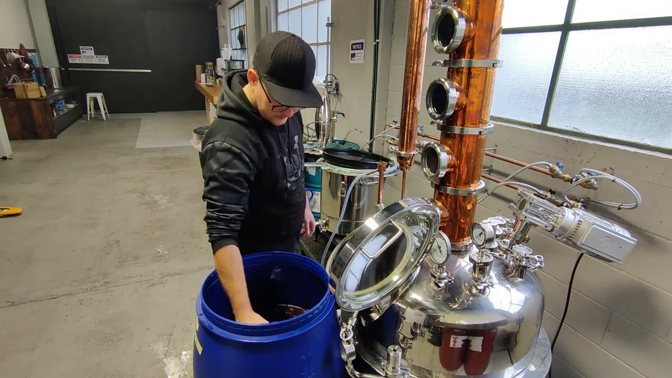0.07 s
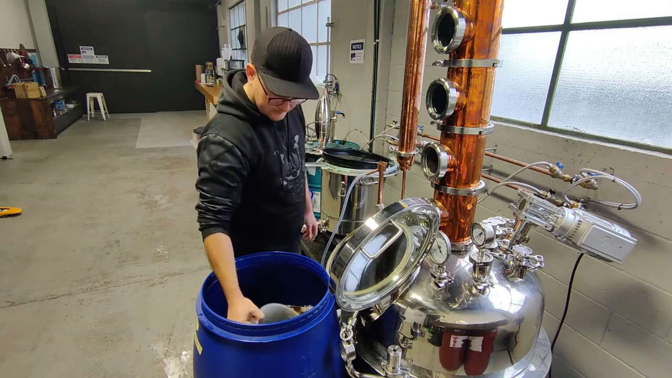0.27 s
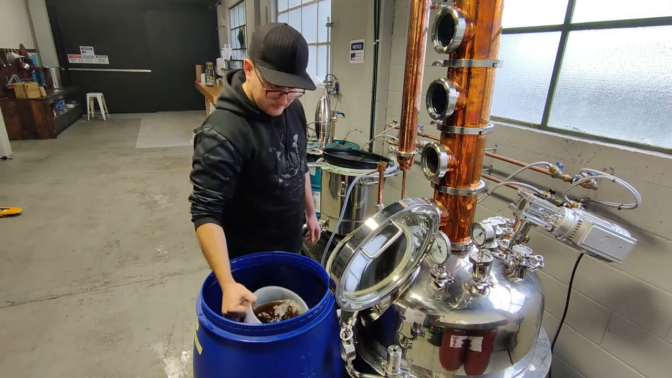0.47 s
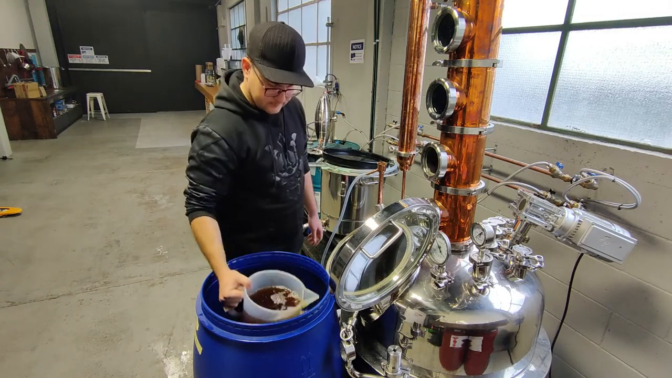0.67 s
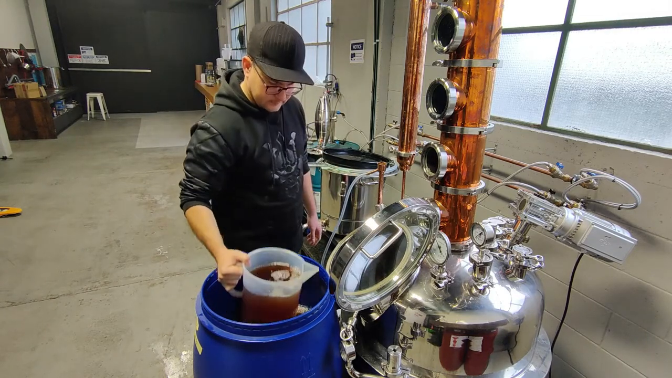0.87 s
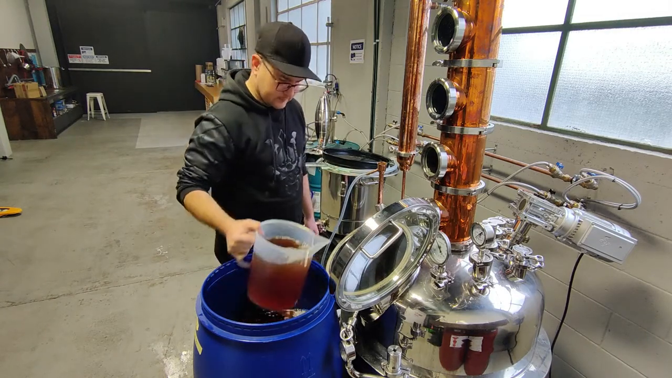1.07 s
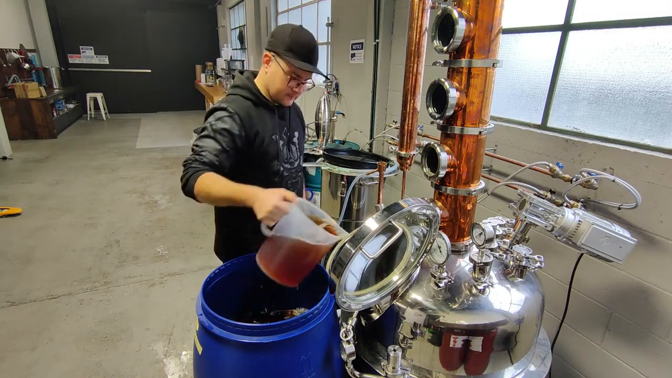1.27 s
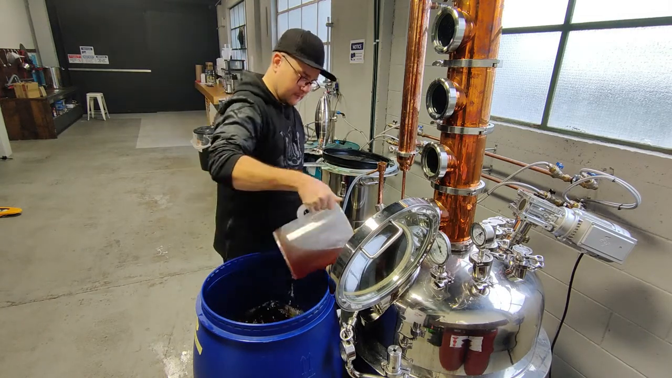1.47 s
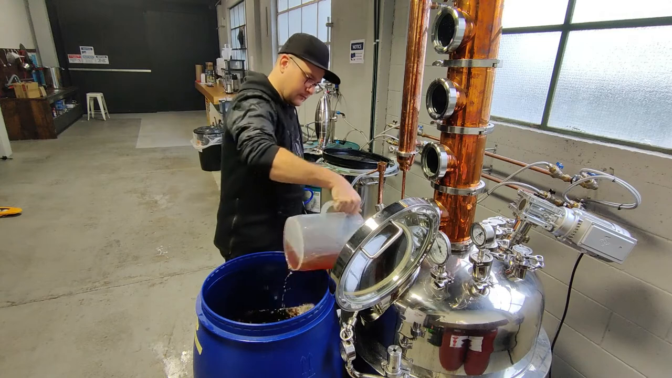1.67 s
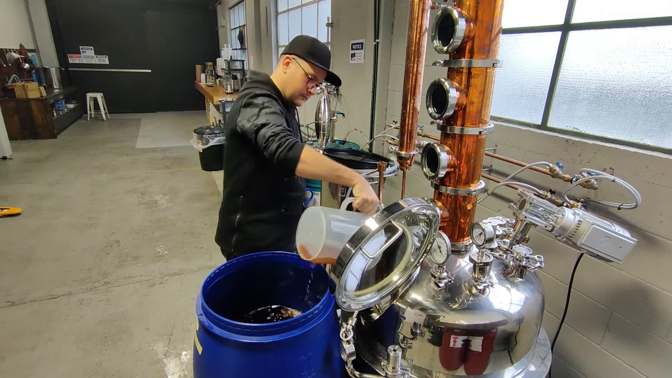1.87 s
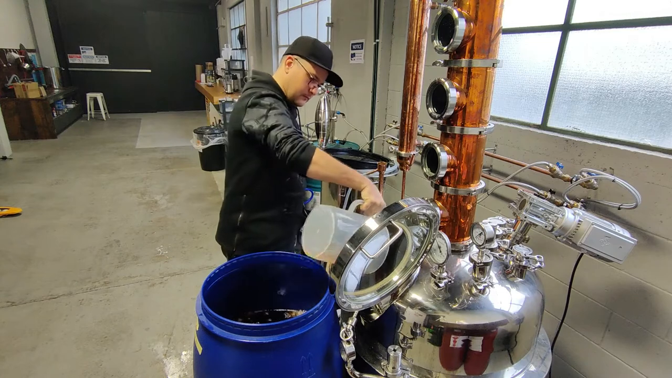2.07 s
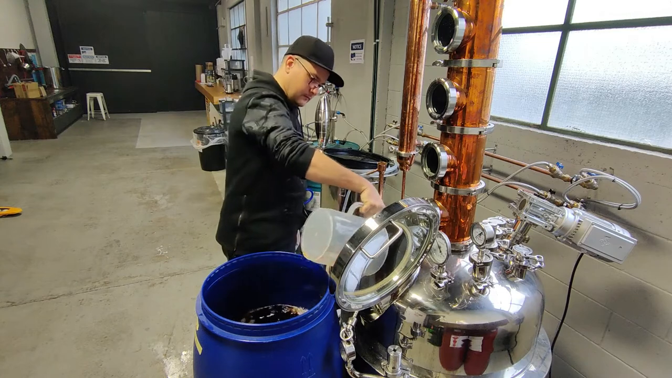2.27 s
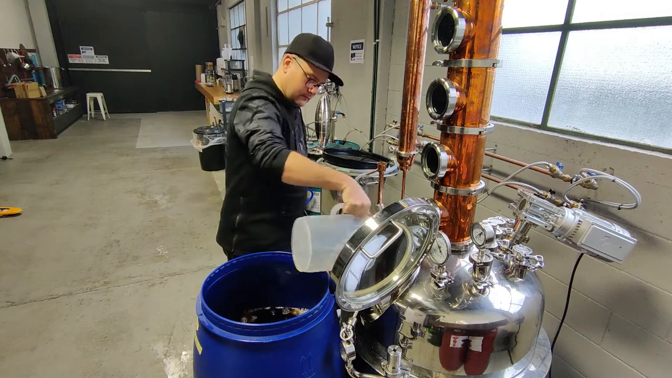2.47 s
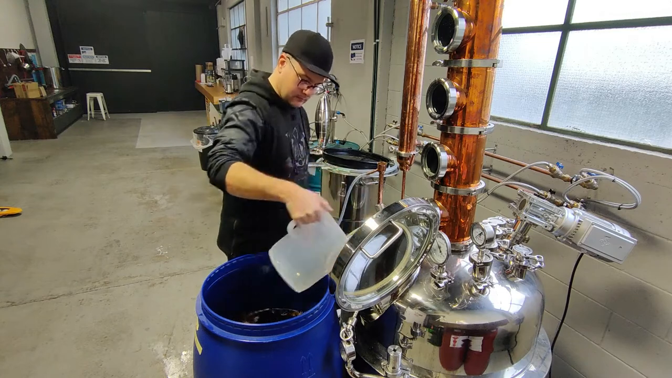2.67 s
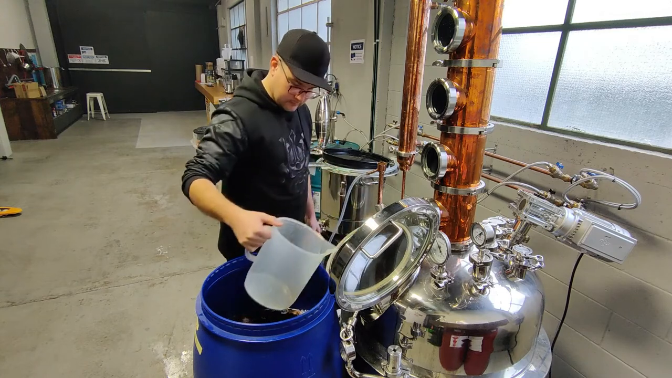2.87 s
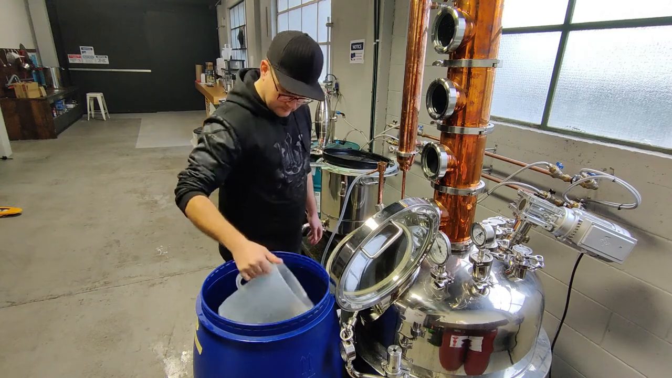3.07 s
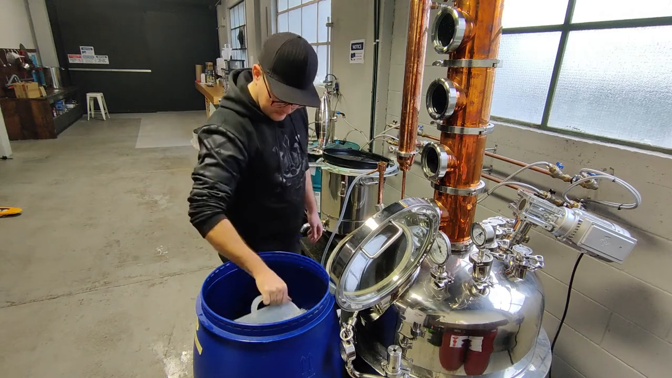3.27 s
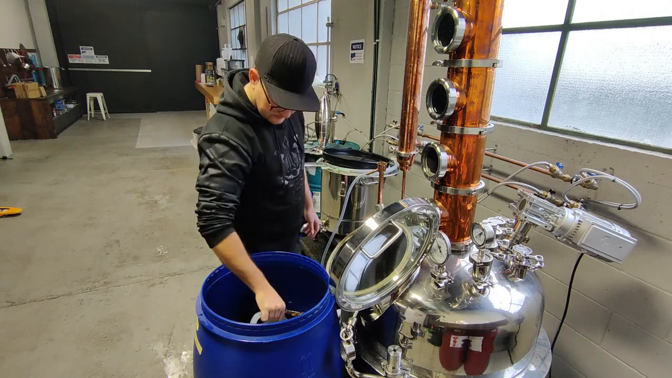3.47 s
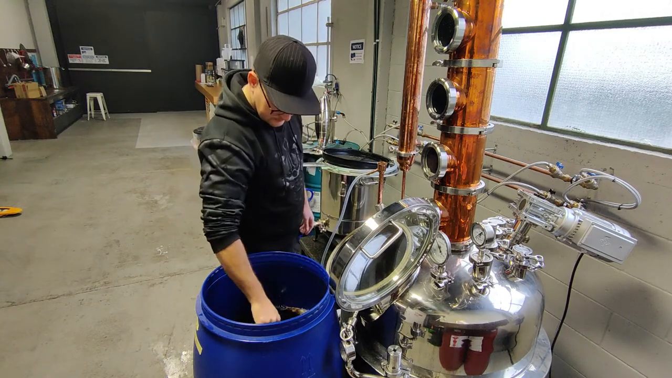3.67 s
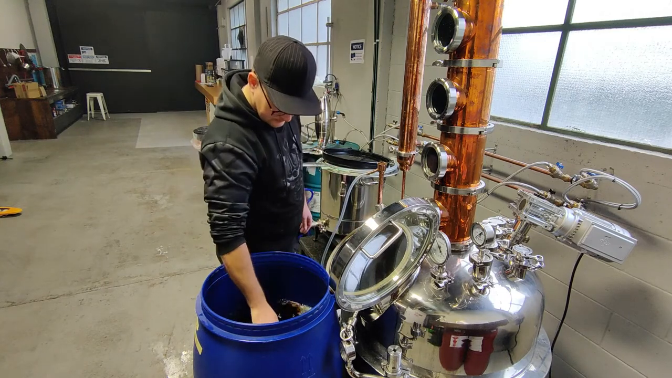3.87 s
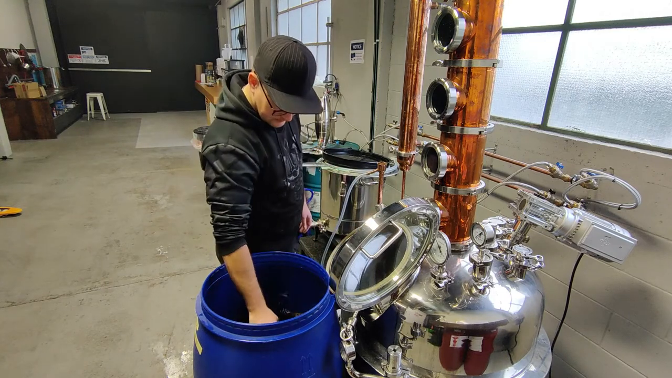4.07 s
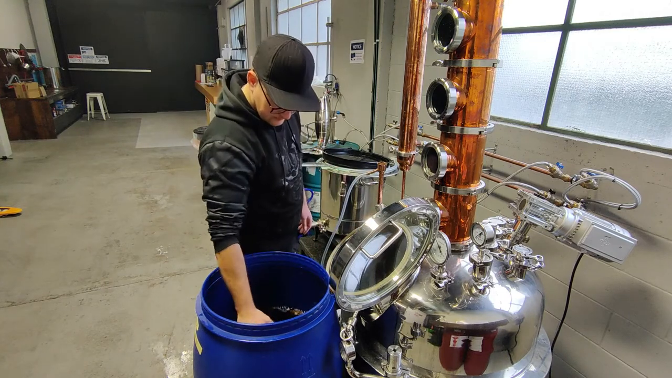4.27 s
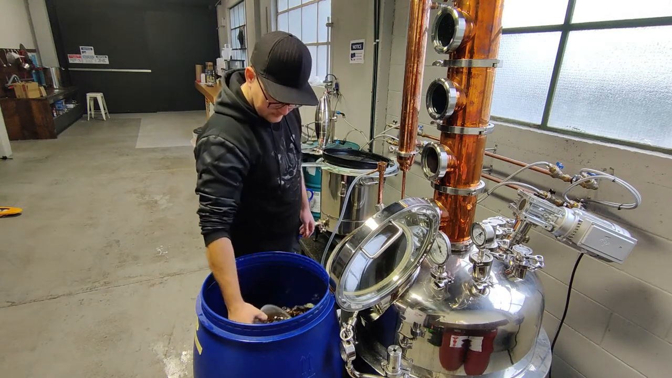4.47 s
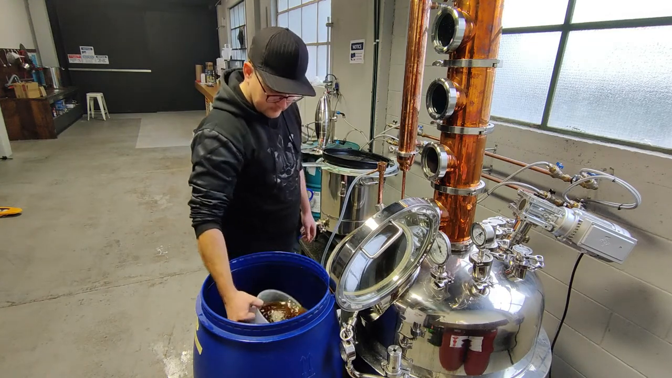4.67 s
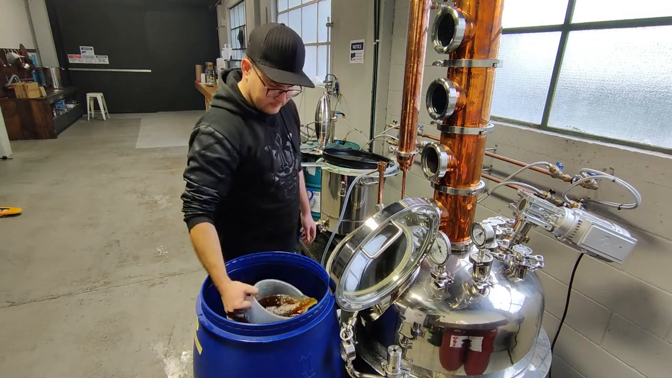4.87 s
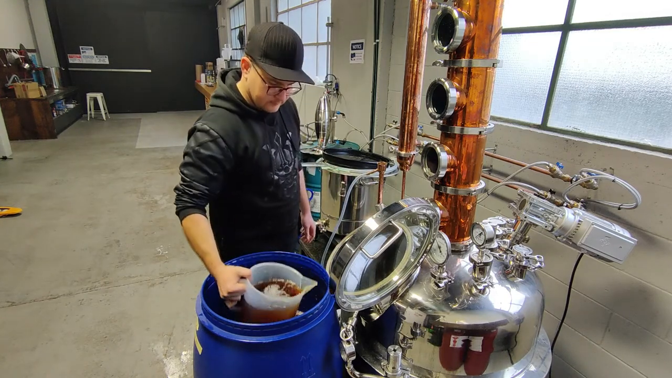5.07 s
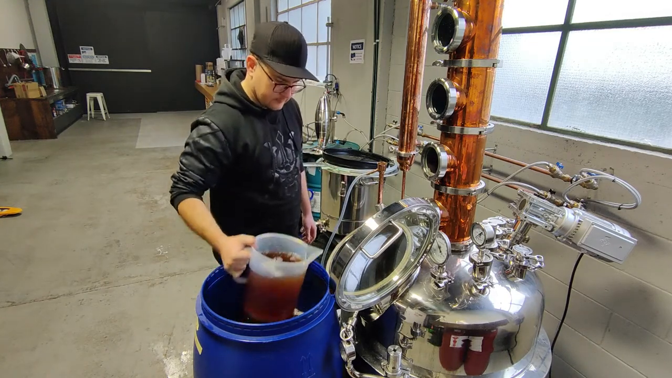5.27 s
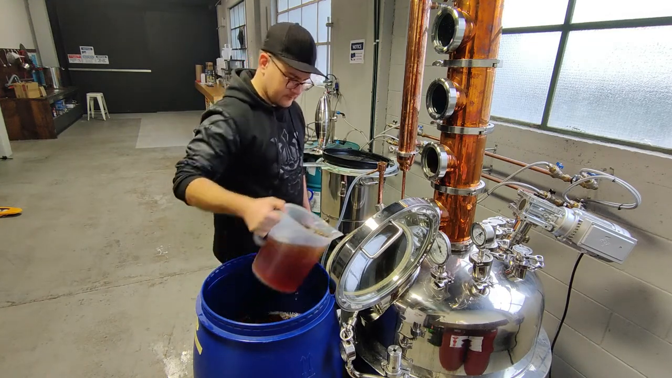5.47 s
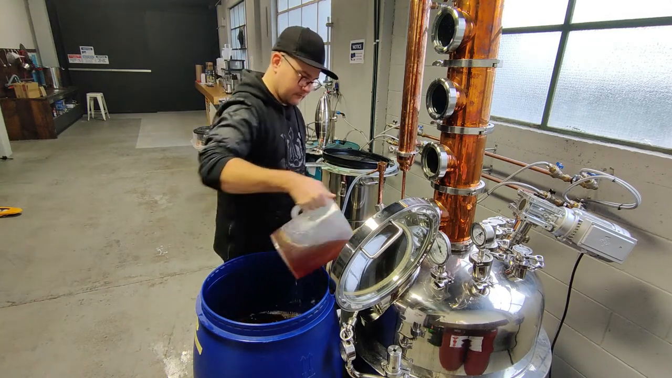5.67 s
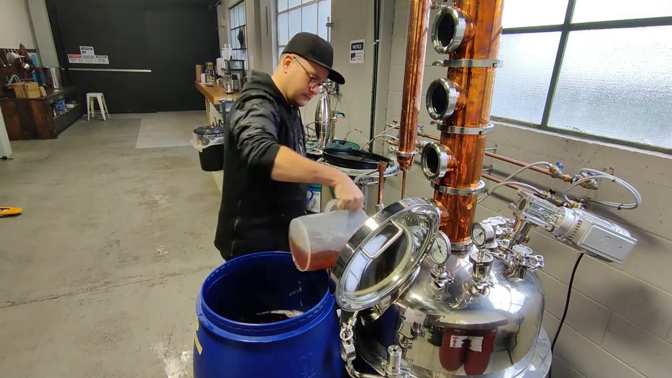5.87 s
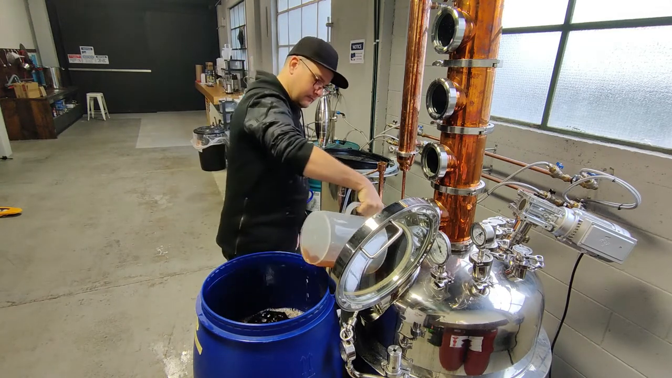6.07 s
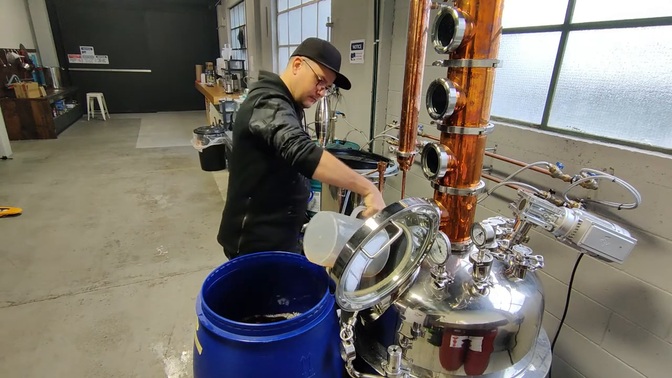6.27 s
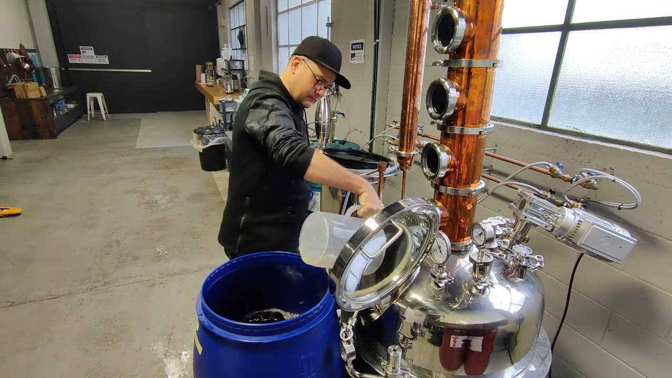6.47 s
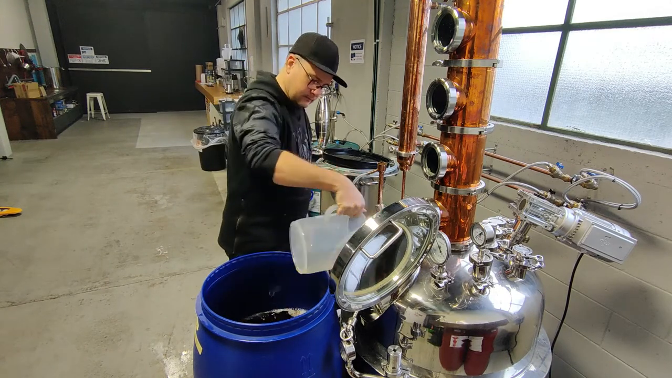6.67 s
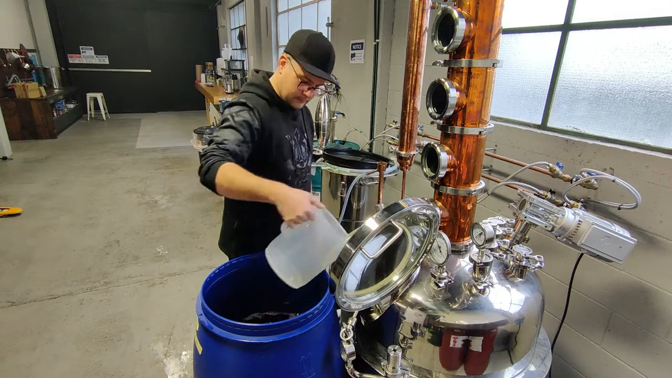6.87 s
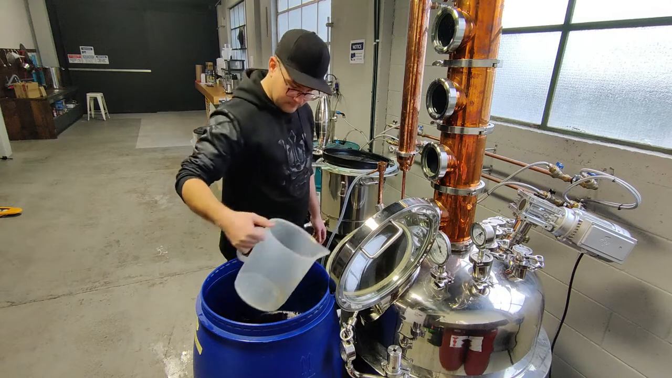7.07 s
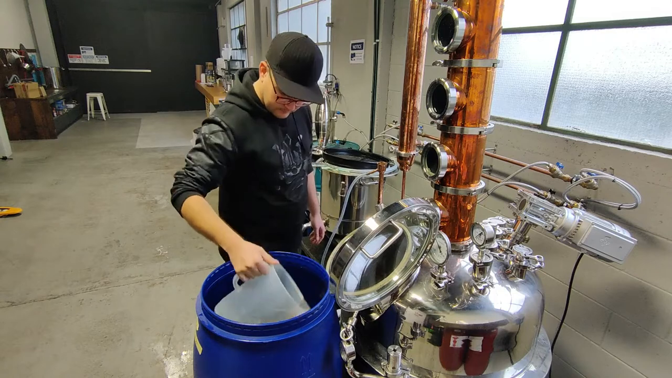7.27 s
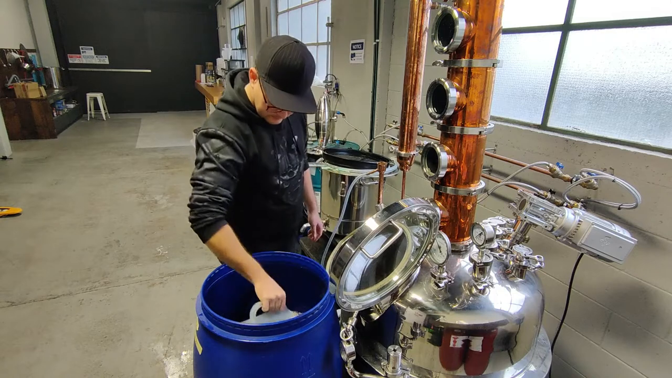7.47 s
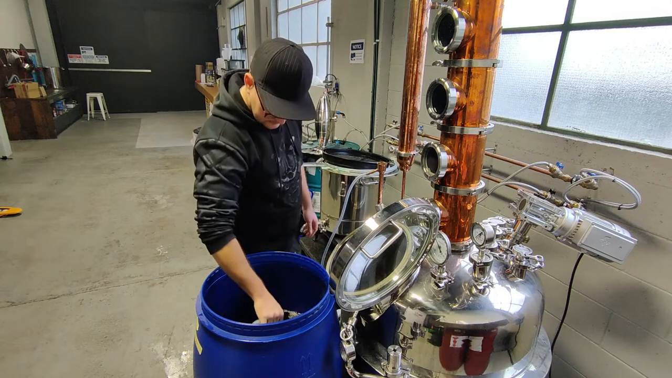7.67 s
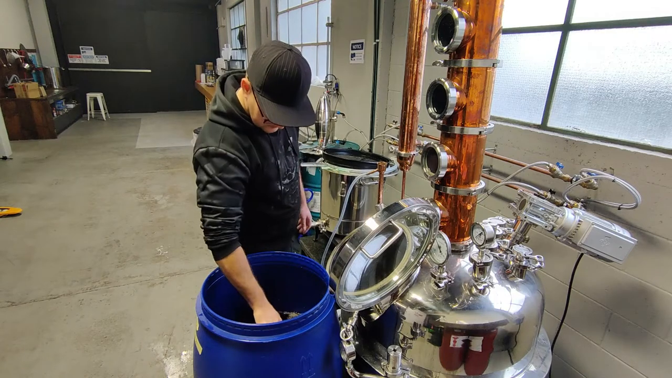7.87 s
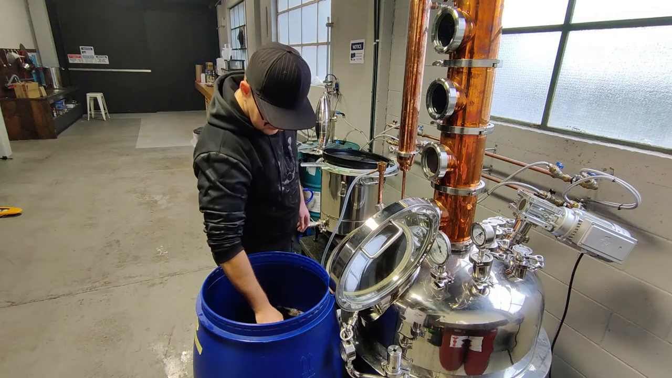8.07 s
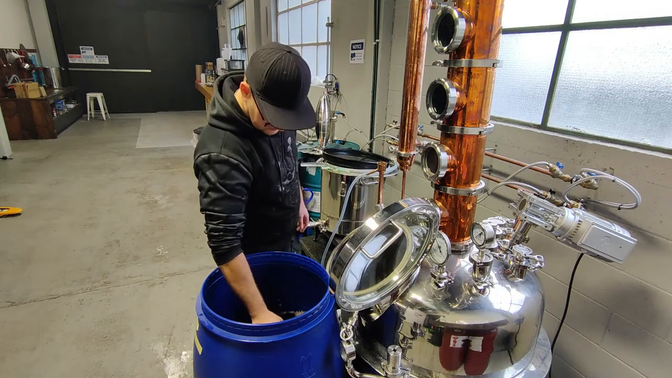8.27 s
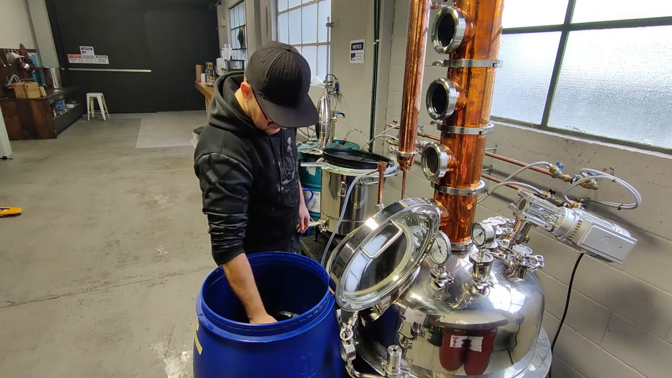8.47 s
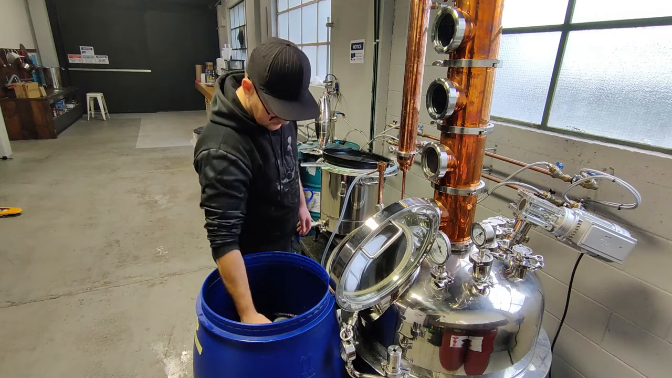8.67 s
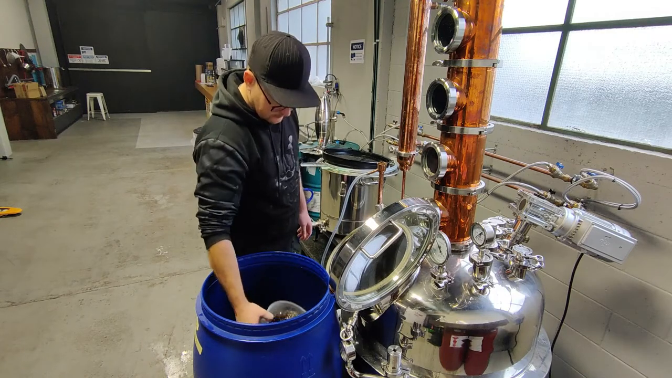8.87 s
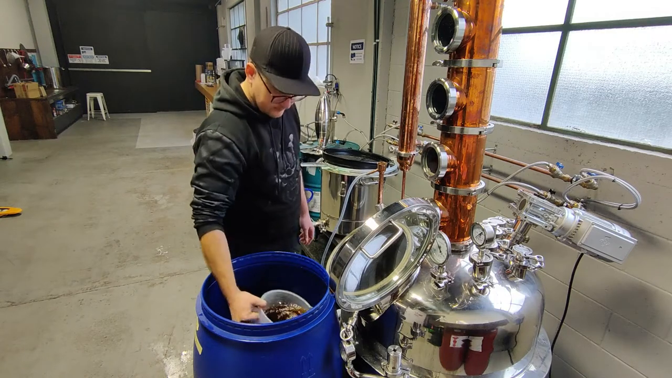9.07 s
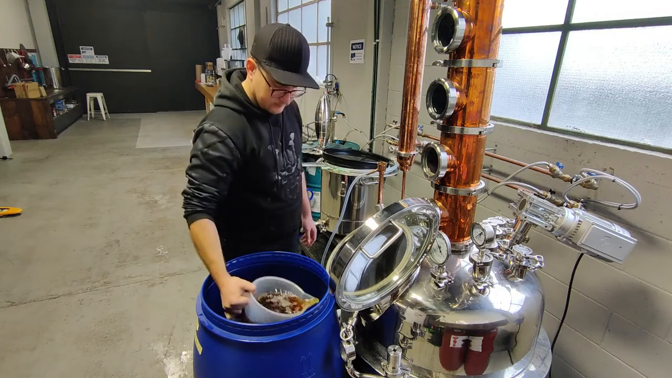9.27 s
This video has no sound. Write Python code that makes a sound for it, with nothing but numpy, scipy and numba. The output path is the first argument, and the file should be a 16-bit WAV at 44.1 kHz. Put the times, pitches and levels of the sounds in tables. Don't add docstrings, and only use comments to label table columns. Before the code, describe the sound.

Two rounds of scooping and pouring, heard close in stereo. Soft glugs and scattered drips lead to a sudden gush into a resonant metal tank, with low air booming across its opening, fading to a trickle. Plastic clacks follow as the jug returns to the drum. After the second pour come another clack and more gurgling, over faint low workshop rumble and short echoes.

```python
import sys
import numpy as np
from scipy import signal
from scipy.fft import rfft, irfft
from scipy.io import wavfile
from scipy.ndimage import uniform_filter1d
from numba import njit

SR = 44100
rng = np.random.default_rng(int(sys.argv[2]) if len(sys.argv) > 2 else 0)


def dump(signal):
    limited = np.clip(np.atleast_2d(signal).T, -1, 1)
    pcm = np.round(limited * 32767).astype(np.int16)
    wavfile.write(sys.argv[1], SR, pcm)


def convert_level_to_amplitude(level_db):
    exponent = np.asarray(level_db, float) / 20
    return 10 ** exponent


N = 410130

# f/Hz, density/dB per Hz
WORKSHOP_SPECTRUM = [(8.8, -30), (15, 8.5), (42, 0.5), (61, -7.5), (173, -31.5), (1150, -37), (1880, -39),
                     (3900, -37.5), (6580, -45), (7390, -48.5), (14400, -48), (15800, -45)]
# f/Hz, side minus mid/dB
SIDE_SPREAD = [(60, -30), (125, -17), (250, -11), (500, -8), (1000, -7), (2000, -3.5), (4000, 0)]
# f/Hz, t60/s
ROOM_DECAY = [(150, 0.38), (600, 0.59), (2000, 0.35), (7000, 0.21)]
# f/Hz, gain/dB
PORT_RESONANCE = [(4500, -0.16), (6600, 4.5), (7500, 2)]
# f/Hz, gain/dB
TREBLE_LIMIT = [(15700, 0), (15790, -70)]

# peak t/s, level/dB, f/Hz, fall/s
FLOOR_SHAKES = [(0, -50, 31.5, .3), (.23, -47, 27.35, 0.25), (.65, -45.5, 25.87, 2.2),
                (1.14, -30, 29.93, 0.058), (1.22, -33, 32, 0.38), (1.68, -34, 32.8, 0.4),
                (1.55, -39.5, 32.7, 0.35), (2.75, -43.5, 39.84, 0.18), (2.98, -48, 34.92, 0.088),
                (3.29, -42, 37.8, 0.47), (3.6, -40.5, 32.98, 0.72), (4.25, -49, 29.87, 0.6),
                (4.61, -48.5, 29.03, 2.6), (5.28, -43, 30.24, 0.18), (5.57, -40.5, 29.35, 0.64),
                (7.25, -41, 27.04, 0.78), (7.95, -40.5, 27.44, 0.69), (8.94, -41.5, 26, 1.2),
                (9.25, -45, 26.2, 0.79)]
# peak t/s, level/dB, rise/s, fall/s
HATCH_GUSTS = [
    (1.89, -27.5, 0.13, 0.19),
    (2.07, -28, 0.19, 0.2),
    (2.31, -25, 0.36, 0.34),
    (2.55, -38.5, 0.59, 0.93),
    (6.251, -26.5, 0.28, 0.42),
    (6.38, -29, 0.41, 0.29),
    (6.55, -28.5, 0.34, 0.59),
    (6.75, -31.5, 0.75, 0.7),
    (8.47, -39, 0.39, 0.56),
]

# t/s, peak level/dB, contact/ms
JUG_KNOCKS = [(1.1, -46, 9), (3.204, -44, 4.2), (3.244, -31, 7), (3.282, -34, 4), (3.316, -47, 2.03),
              (3.357, -19, 0.53), (3.39, -33, 0.93), (3.425, -29, 2.3), (7.566, -20.5, 0.47),
              (7.579, -28.5, 2), (7.599, -28, 1.04), (7.62, -31.5, 0.79)]
# f/Hz, level/dB, t60/s
DRUM_MODES = [(70.4, -5.5, 0.2), (112, -4, 0.3), (159, -4, 0.32), (219.1, 1.5, 0.12), (259, -2, 0.13),
              (341, -8.5, 0.25), (423.9, -9, 0.19), (540, -8, 0.09), (725, -7, 0.12), (865, 0, 0.063),
              (998, -1.5, 0.08), (1220, -14, 0.13), (1458, -4, 0.11), (2670, -12, 0.087)]

# t/s, peak level/dB, f/Hz
GULP_BUBBLES = [(0.05, -38, 727), (0.23, -45, 940), (0.329, -34, 615), (1.744, -47.5, 319),
                (4.151, -36.5, 500), (4.249, -43, 657), (4.479, -48, 650), (4.704, -35.5, 618),
                (4.908, -34, 725), (5.145, -40, 738), (5.17, -38.5, 521), (6.064, -31, 284),
                (6.129, -30, 626), (6.147, -29, 623), (8.301, -28, 225), (8.487, -33.5, 654),
                (8.778, -33, 807), (8.794, -34.5, 860), (9.166, -30, 662)]
# t/s, peak level/dB, f/Hz
DRIP_BUBBLES = [(0.2478, -42, 1260), (0.3428, -30, 1976), (0.6516, -39, 1340), (0.7694, -39, 3450),
                (0.9692, -49.5, 1234), (1.3585, -51, 1910), (1.6122, -40.5, 3050), (1.7439, -43.5, 2240),
                (1.809, -23.5, 1444), (2.9043, -42, 1420), (3.5783, -48, 1860), (3.799, -47, 1597),
                (4.041, -51, 1340), (4.144, -39, 1243), (4.8, -34, 1250), (4.9854, -35.5, 1350),
                (5.103, -40, 1210), (5.2985, -41.5, 2790), (5.3894, -68, 2110), (5.5494, -49, 2080),
                (5.7182, -42.5, 2070), (5.9638, -44, 2414), (6.0511, -37, 1850), (6.342, -20, 1990),
                (7.0378, -41, 1394), (7.8585, -46, 1970), (8.7241, -44, 1290), (8.996, -35.5, 1330),
                (9.2416, -33.5, 1520), (0.46, -42, 2300), (0.555, -45, 1600), (0.695, -43, 1300),
                (0.7, -45, 2050), (4.49, -45, 900), (4.553, -43, 1100), (4.94, -40, 2200),
                (4.985, -40, 2100), (5.01, -41, 2300), (5.17, -44, 1950), (5.37, -48, 1800),
                (5.38, -49, 3000), (8.295, -43, 2150), (8.46, -44, 1400), (8.49, -45, 1850),
                (5.84, -56, 700)]
# t/s, peak level/dB, f/Hz
PLINK_BUBBLES = [(0.992, -41, 4870), (1.0787, -44.5, 8530), (1.3638, -48.5, 4300), (3.467, -49, 7540),
                 (5.9643, -53, 6540), (7.0736, -37, 6140), (7.3013, -49, 7740), (7.3414, -43.5, 6610),
                 (7.7307, -49, 6080), (7.897, -43, 6060), (7.998, -47.5, 6700), (8.288, -34, 5450),
                 (8.4998, -48, 7820)]
# start t/s, length/s, first f/Hz, last
# f/Hz, level/dB
GLUG_TRAINS = [(0.35, .1, 464, 724, -51.5), (0.71, 0.037, 420, 470, -60), (1.8, 0.15, 330, 276, -62),
               (3.24, 0.15, 520, 545, -45), (3.251, 0.073, 870, 790, -54.5), (4.039, 0.05, 1160, 1340, -57),
               (4.548, 0.062, 692, 720, -45.5), (4.662, 0.11, 520, 463, -44.5),
               (8.389, 0.16, 612, 630, -42.5), (8.285, 0.04, 476, 380, -45), (4.17, 0.059, 230, 240, -48.5),
               (0.061, 0.047, 210, 230, -64.5), (8.715, 0.033, 1390, 1270, -53),
               (3.96, 0.054, 1880, 2370, -54), (1.81, .08, 1400, 1570, -38), (1.89, 0.046, 850, 640, -39),
               (1.945, .045, 900, 1020, -39), (2.05, .05, 1500, 1600, -40), (2.12, .04, 700, 890, -40),
               (6.35, .1, 695, 860, -37.5), (5.28, .05, 3100, 3900, -56), (8.732, 0.09, 610, 630, -42),
               (3.235, .08, 6900, 6300, -52.5), (3.24, .05, 3000, 3100, -55), (.228, .05, 690, 1500, -47),
               (.5, .06, 520, 480, -54), (0.75, .04, 2800, 2800, -49), (3.81, 0.039, 1540, 1400, -57),
               (4.5, .08, 1250, 1350, -50), (4.155, 0.045, 2000, 1800, -45), (5, 0.023, 1800, 2000, -45),
               (8.31, 0.046, 1330, 1150, -52), (9.7, 0.044, 1500, 1610, -54), (9.07, .04, 1800, 1900, -49),
               (9.8, .1, 850, 780, -45), (6.07, .05, 990, 1200, -36.5), (6.21, .04, 1200, 1500, -34),
               (6.43, .04, 1100, 1500, -34), (3.2, .04, 305, 438, -53), (3.3, 0.036, 1300, 1370, -60)]
# t/s, peak level/dB, mist minus peak/dB
WATER_SLAPS = [(0.2324, -63, -22), (0.687, -36.5, -10), (1.0774, -58, 3), (1.6122, -48.5, -7),
               (1.81, -29, -14), (2.905, -52, -4), (3.4715, -41.5, -8), (3.78, -61, -20),
               (4.1407, -31, -29), (4.984, -41, -4), (5.9639, -57.5, 9), (6.0496, -35, -20),
               (6.342, -21, -24), (7.039, -48, -15), (7.7315, -41.5, -6), (7.8578, -48, -23),
               (8.296, -37, -20), (8.4868, -39.5, -21), (8.7929, -47, -7), (8.9195, -36.5, -10),
               (9.1662, -34, -26), (9.2421, -38.5, -13)]

# f/Hz, density/dB per Hz
WATER_SPECTRUM = [(35, -4), (60, 5), (76, -13.5), (184, -26), (300, -27), (361, -29.5), (415, -21),
                  (456, -25), (744, -21), (1930, -20.5), (2740, -23), (6650, -31), (15800, -42.5)]
WATER_SPLITS_HZ = 95, 400, 2500, 7200, 15900
# peak t/s, spray level/dB, rise/s, fall/s, gurgle minus spray/dB
DRUM_STIRS = [(.07, -63.5, 0.82, 0.17, 5), (.245, -62.5, 0.036, 0.68, 8.5), (0.358, -44.5, 0.15, 0.5, -2.5),
              (.62, -58.5, 0.99, 0.54, -3), (3.52, -56, 0.3, 0.58, 0.5), (3.665, -62, .1, .35, -3),
              (3.79, -62, 0.038, 0.38, -1), (4.161, -43, 0.055, 0.61, 2), (4.47, -60.5, 0.13, 0.97, 1),
              (4.75, -46, 0.48, 0.59, 1.5), (4.92, -48, 0.28, 0.54, 2.5), (5.08, -55, 0.46, 0.22, 1),
              (5.19, -60, 0.21, 0.37, 4.5), (7.33, -70, .4, .3, 9), (7.764, -57.5, 0.24, 0.51, -2.5),
              (7.92, -61, 0.75, 0.087, 0), (8.296, -51, 0.043, 1.26, -3), (8.52, -59, 0.88, 0.14, 5),
              (8.94, -47, 0.31, 2.27, 3)]
# peak t/s, spray level/dB, rise/s, fall/s
JUG_RUNOFF = [(.84, -54.5, 0.46, 0.25), (.97, -60.5, 0.2, .35), (1.11, -60, 0.05, 0.27),
              (1.63, -59, 0.15, 0.53), (5.31, -55.5, 0.15, 0.16), (5.388, -58, 0.043, 0.11),
              (5.55, -69, 0.18, 0.36), (5.72, -64.5, 0.15, 0.4), (5.97, -67, 0.34, 0.07),
              (7.08, -57, 0.033, 0.54), (7.4, -66, 0.72, 0.21), (8.255, -57.5, 0.048, 0.18)]
# peak t/s, level/dB, rise/s, fall/s
BULK_HEAVES = [(.08, -59, .3, 0.12), (.36, -58, 0.15, 1), (.8, -61, 0.97, 0.06), (1.11, -55, 0.035, 0.74),
               (3.5, -45, 0.57, 0.51), (4.16, -52.5, 0.076, 0.46), (4.75, -47, 0.16, 0.7),
               (5.05, -50, 0.75, 0.57), (7.28, -58.5, 0.95, 0.53), (7.72, -51, 0.24, 0.48),
               (8.296, -50, 0.026, 0.68), (8.94, -50, 0.18, 2.8)]
# t/s, spray level/dB
STILL_POURS = [
    [(1.75, -77.5), (1.83, -37.5), (1.93, -37.5), (2.2, -38.5), (2.5, -41.5), (2.65, -49), (2.82, -62.5),
     (2.96, -71), (3.1, -78)],
    [(6.01, -75), (6.07, -42), (6.2, -39), (6.41, -39), (6.7, -42), (6.9, -48.5), (7.06, -66), (7.2, -81)],
]
# f/Hz, width/Hz, level/dB
SHELL_MODES = [(106.7, 7.1, -1), (165.2, 6.5, -6), (258.1, 5.3, -2.5), (300.6, 33, -0.5), (410.5, 17, -2),
               (511.6, 4.4, 0), (638, 8.4, 0.5), (727, 5.2, -5), (1038, 16, 1.5)]

SWELL_DB = 33.5
FIZZ_DB = -0.5


def level(x, db=0):
    return x * convert_level_to_amplitude(db) / np.sqrt(np.mean(x ** 2))


def curve(t_s, values):
    return np.interp(np.arange(N) / SR, t_s, values)


def colour(x, points):
    hz, db = np.transpose(points)
    f = np.fft.rfftfreq(x.shape[-1], 1 / SR) + 1
    gain = convert_level_to_amplitude(np.interp(np.log(f), np.log(hz), db))
    return irfft(rfft(x) * gain, x.shape[-1])


def band(x, lo_hz, hi_hz):
    sos = signal.butter(2, [lo_hz, hi_hz], "band", fs=SR, output="sos")
    return signal.sosfilt(sos, x)


def walk(rate_hz):
    k = int(SR / rate_hz)
    held = np.repeat(rng.standard_normal(N // k + 1), k)
    return 0.613 * uniform_filter1d(uniform_filter1d(held, k), k)[:N]


def wide(mid, side):
    return mid + colour(side, SIDE_SPREAD) * np.array([[1], [-1]])


def swell(peak_s, db, rise_s, fall_s):
    t = np.arange(0, N / SR + 0.002, 0.001)
    late = t[:, None] - peak_s
    below_peak = SWELL_DB * np.maximum(-late / rise_s, late / fall_s)
    return curve(t, convert_level_to_amplitude(db - below_peak).sum(axis=1))


def pour(full_db, empty_db):
    t, out = np.arange(N) / SR, 0
    for s, flow_db in map(np.transpose, STILL_POURS):
        emptied = np.clip((t - s[0]) / 0.69, 0, 1)
        share_db = full_db + (empty_db - full_db) * emptied
        out = out + (t > s[0]) * (t < s[-1]) * convert_level_to_amplitude(curve(s, flow_db) + share_db)
    return out


@njit
def add_rings(out, start, hz, t60, size, glide):
    for k in range(len(start)):
        n, phase = int(t60[k] * SR), 0.
        fade, a = np.exp(-np.log(1000) / n), size[k]
        for i in range(min(n, len(out) - start[k])):
            phase += 2 * np.pi * hz[k] * (1 + glide[k] * i / n) / SR
            out[start[k] + i] += a * np.sin(phase)
            a *= fade


def swarm(count, lo_hz, hi_hz, cycles, scatter_db, glide):
    when, pitch, rank = rng.random((count, 3)).T
    hz, out = lo_hz * (hi_hz / lo_hz) ** pitch, np.zeros(N)
    size = hz * convert_level_to_amplitude(-scatter_db * np.log(rank + 30 / count))
    add_rings(out, (when * N).astype(np.int64), hz, cycles / hz, size, glide + 0 * hz)
    return out


def workshop():
    hum = wide(*colour(rng.standard_normal((2, N)), WORKSHOP_SPECTRUM))
    return level(hum * convert_level_to_amplitude(3.7 * walk(rate_hz=1.54)), -50)


def room(x):
    t = np.arange(SR) / SR
    tail = sum(band(rng.standard_normal((2, SR)), f / 2, f * 2) * 1000. ** (-t / t60)
               for f, t60 in ROOM_DECAY)
    tail = wide(*tail) * np.clip(t / 0.0035, 0, 1)
    tail = tail * convert_level_to_amplitude(-6) / np.sqrt(np.sum(tail ** 2) / 2)
    return signal.fftconvolve(x[None], tail, axes=1)[:, :N]


def boom():
    s, db, hz, fall = np.transpose(sorted(FLOOR_SHAKES))
    waver = 1.025 + 0.0484 * walk(rate_hz=12)
    rumble = level(band(rng.standard_normal(N), 16, 56.7), -11.0)
    flutter = convert_level_to_amplitude(4 * walk(rate_hz=12))

    def tone(f_hz):
        phase = 2 * np.pi * np.cumsum(f_hz * waver) / SR
        return flutter * (np.sqrt(2) * np.sin(phase) + rumble)

    still = swell(*np.transpose(HATCH_GUSTS)) * tone(44.4)
    floor = swell(s, db, fall * 0.55, fall) * tone(curve(s, hz))
    return still + floor


def knocks():
    out, t = np.zeros(N), np.arange(SR) / SR
    hz, db, t60 = np.repeat(DRUM_MODES, 2, axis=0).T
    sign = (-1.) ** (np.arange(len(hz)) // 2)
    for s, peak_db, contact_ms in JUG_KNOCKS:
        ring, u = np.zeros(SR), rng.standard_normal((len(hz), 2)).T
        start = np.zeros(len(hz), np.int64)
        add_rings(ring, start, hz * (1 + 0.03 * u[0]), t60, convert_level_to_amplitude(db + 1.9 * u[1]) * sign, 0 * hz)
        noise = rng.standard_normal(SR)
        crack, clatter = np.exp(-t / 0.0036), np.exp(-t / 0.028)
        ring += band(noise, 500, 2400) * (convert_level_to_amplitude(13.0) * crack + convert_level_to_amplitude(7.5) * clatter)
        ring += band(noise, 700, 1070) * convert_level_to_amplitude(10.5) * clatter
        ring = np.convolve(ring, np.hanning(int(contact_ms * SR / 1000) + 3))[:SR]
        ring /= np.abs(ring).max()
        ring += convert_level_to_amplitude(-21.5 - 5.3 * contact_ms) * band(noise, 1600, 4100) * np.exp(-t / 0.014)
        i = int(s * SR)
        out[i:i + SR] += ring * convert_level_to_amplitude(peak_db)
    return out


def blips():
    busy = swell(*np.transpose(DRUM_STIRS)[:4]) + pour(-2, -8)
    bubbles = swarm(count=450, lo_hz=500, hi_hz=4200, cycles=90, scatter_db=2.2, glide=0.12)
    return busy * level(bubbles, -6)


def drops():
    s, db, hz = np.transpose(GULP_BUBBLES + DRIP_BUBBLES + PLINK_BUBBLES)
    t60 = 0.062 * (1000 / hz) ** 0.45
    out, u = np.zeros(N), rng.random((len(s), 5)).T
    add_rings(out, (s * SR).astype(np.int64), hz, t60, convert_level_to_amplitude(db - 4.0), 0.058 + 0.08 * u[0])
    for late, off in (u[1:3], u[3:5]):
        start = ((s + 0.004 + late * t60 * 0.25) * SR).astype(np.int64)
        add_rings(out, start, hz * (0.9 + 0.248 * off), t60 * 0.97, convert_level_to_amplitude(db - 7.5), 0.11 + 0 * s)
    return out


def glugs():
    out = np.zeros(N)
    for s, length_s, first_hz, last_hz, db in GLUG_TRAINS:
        jitter, detune, weaker = rng.random((12, 3)).T
        along = (np.arange(12) + jitter) / 12
        hz = (first_hz + (last_hz - first_hz) * along) * (0.96 + 0.08 * detune)
        start = ((s + length_s * along) * SR).astype(np.int64)
        add_rings(out, start, hz, 44 / hz, convert_level_to_amplitude(db - 1.6 * weaker), 0.038 + 0 * hz)
    return out


def slaps():
    decay = np.zeros((2, N))
    t = np.arange(SR // 2) / SR
    for s, db, mist_db in WATER_SLAPS:
        i = int(s * SR)
        burst = convert_level_to_amplitude([[db], [db + mist_db]]) * 1000. ** (-t / 0.2)
        decay[:, i:i + len(t)] += burst[:, :N - i]
    noise = wide(*rng.standard_normal((2, N)))
    spray = decay[0] * level(band(noise, 890, 6070))
    mist = decay[1] * level(band(noise, 5600, 11800))
    return convert_level_to_amplitude(-9.0) * (spray + mist)


def layer(lo_hz, hi_hz, bubbles, bubble_db, flicker_db):
    edges = np.geomspace(lo_hz / 1.3, min(hi_hz * 1.3, 0.45 * SR), 6)
    rush = sum(convert_level_to_amplitude(flicker_db * walk(rate_hz=14)) * band(rng.standard_normal((2, N)), a, b)
               for a, b in zip(edges, edges[1:]))
    mixed = [level(band(r, lo_hz, hi_hz)) + level(band(b, lo_hz, hi_hz), bubble_db)
             for r, b in zip(rush, bubbles)]
    return level(wide(*colour(np.array(mixed), WATER_SPECTRUM)))


def swirled(gain):
    keep = np.exp(-1 / (0.32 * SR))
    return gain + convert_level_to_amplitude(-21.5) * signal.lfilter([1 - keep], [1, -keep], gain)


def shell():
    push = rng.standard_normal((2, N))
    ring = sum(convert_level_to_amplitude(db) * level(band(push, f - w / 2, f + w / 2)) for f, w, db in SHELL_MODES)
    return level(wide(*ring), -4) * swirled(pour(-2.8, -3.5))


def water():
    s, db, rise, fall, gurgle_db = np.transpose(DRUM_STIRS)
    stirs, runoff = swell(s, db, rise, fall), swell(*np.transpose(JUG_RUNOFF))
    spray = stirs + runoff + pour(0, 0)
    mist = convert_level_to_amplitude(-9.5) * stirs + convert_level_to_amplitude(-8) * runoff + pour(-12.5, -6.5)
    gurgle = swell(s, db + gurgle_db, rise, fall * 0.91) + convert_level_to_amplitude(-8.5) * runoff
    gurgle = gurgle + swirled(pour(5.8, -1)) + convert_level_to_amplitude(-82)
    slosh = swell(*np.transpose(BULK_HEAVES)) + pour(-13, -10) + convert_level_to_amplitude(-72)
    surge = convert_level_to_amplitude(2.04 * walk(rate_hz=22) + 1.84 * walk(rate_hz=9))
    fizz = [swarm(count=16000, lo_hz=1800, hi_hz=17000, cycles=90, scatter_db=2.8, glide=0.1)
            for _ in range(2)]
    glug = [swarm(count=7000, lo_hz=300, hi_hz=3300, cycles=80, scatter_db=2.6, glide=0.15)
            for _ in range(2)]
    gulp = [swarm(count=500, lo_hz=100.0, hi_hz=508, cycles=13.7, scatter_db=2.0, glide=0.18)
            for _ in range(2)]
    deep, low, mid, high, top = WATER_SPLITS_HZ
    out = surge * spray * layer(mid, high, fizz, FIZZ_DB, flicker_db=0.88)
    out += surge * mist * layer(high, top, fizz, FIZZ_DB - 2.5, flicker_db=0.32)
    out += gurgle * layer(low, mid, glug, 1, flicker_db=0.18)
    out += slosh * layer(deep, low, gulp, -2.6, flicker_db=7.7)
    return out + shell()


def scene():
    far, deep, wet = workshop(), boom(), slaps() + water()
    hits = knocks() + blips() + drops() + glugs()
    left, right = hits + room(hits) + wet
    left_db, lag_samples = 1.06, 4
    near = np.array([left * convert_level_to_amplitude(left_db / 2), np.roll(right, lag_samples) * convert_level_to_amplitude(-left_db / 2)])
    rumble_side = level(band(rng.standard_normal(N), 34, 52), -40)
    return near + wide(deep, rumble_side) + far


def band_limit(x):
    return signal.sosfilt(signal.butter(12, 15910, fs=SR, output="sos"), x)


def record(dry):
    ported = colour(dry, PORT_RESONANCE)
    return band_limit(colour(ported, TREBLE_LIMIT))


dry = scene()
out = record(dry)
dump(out)
```